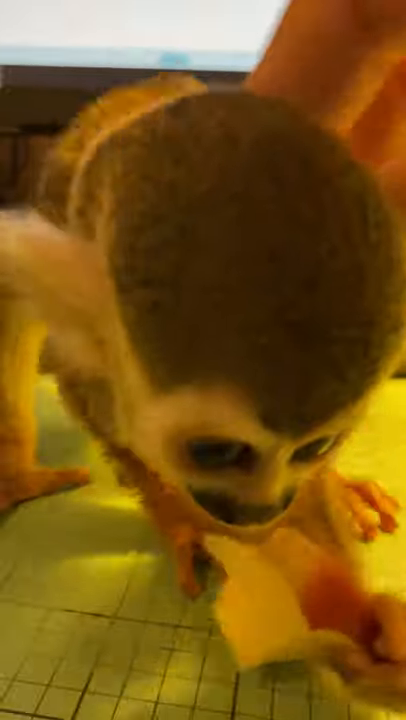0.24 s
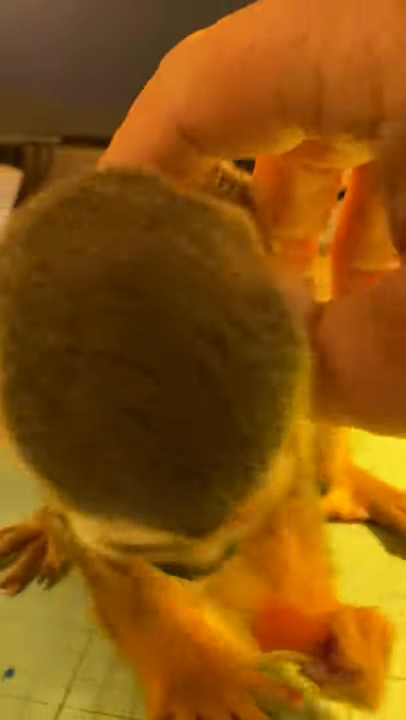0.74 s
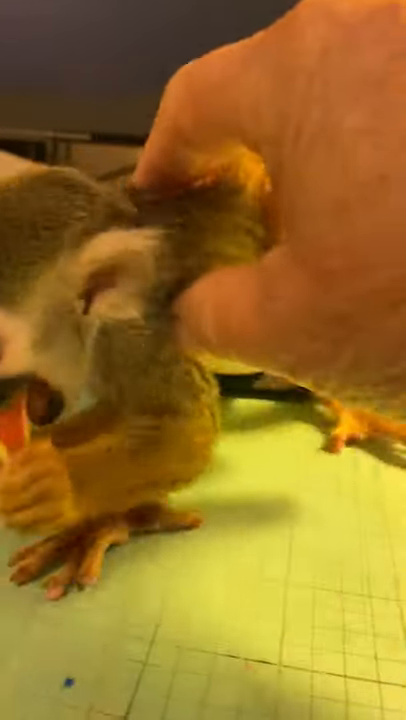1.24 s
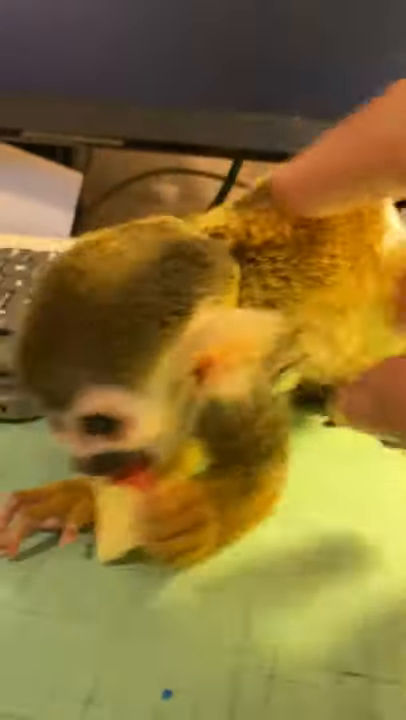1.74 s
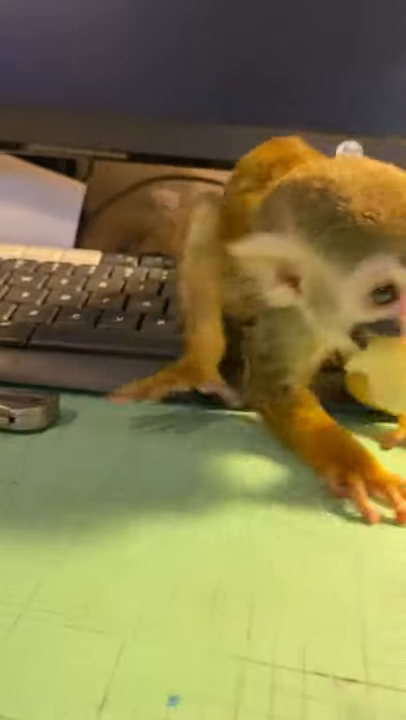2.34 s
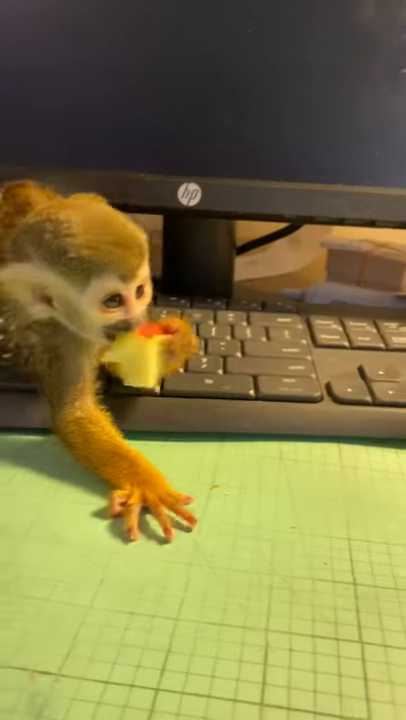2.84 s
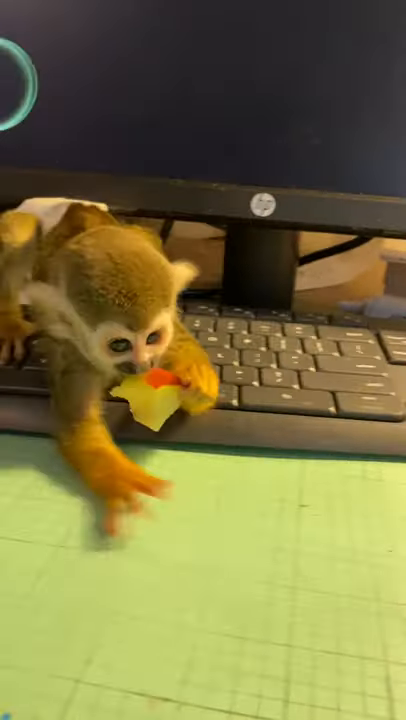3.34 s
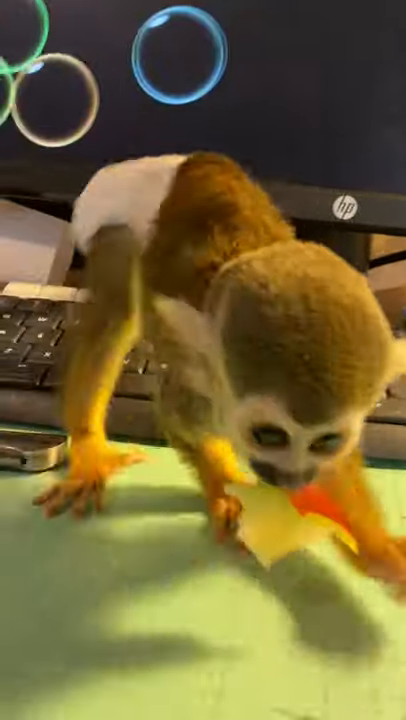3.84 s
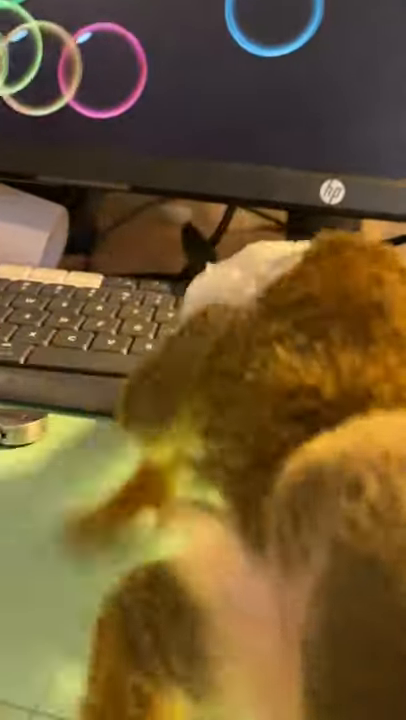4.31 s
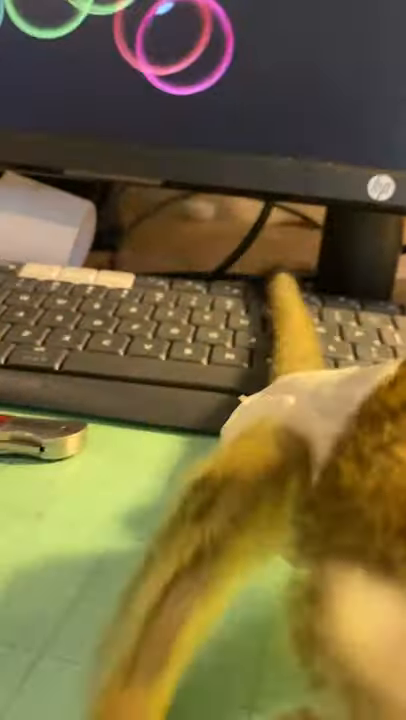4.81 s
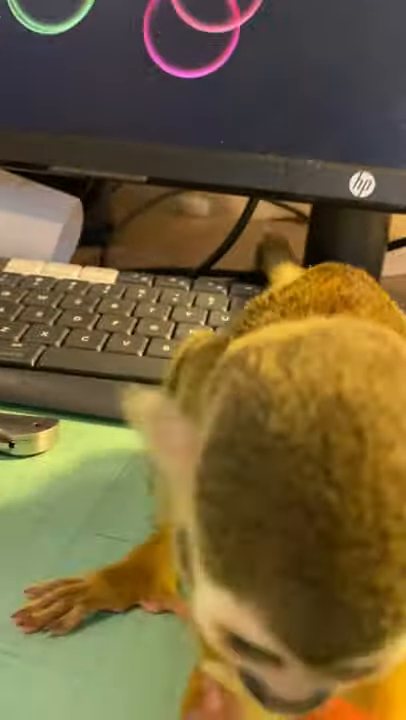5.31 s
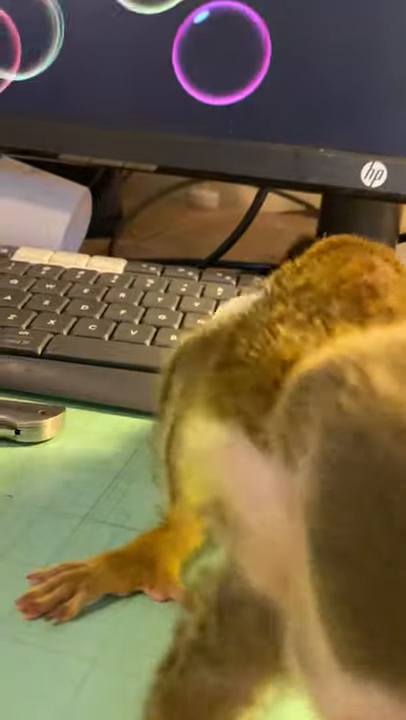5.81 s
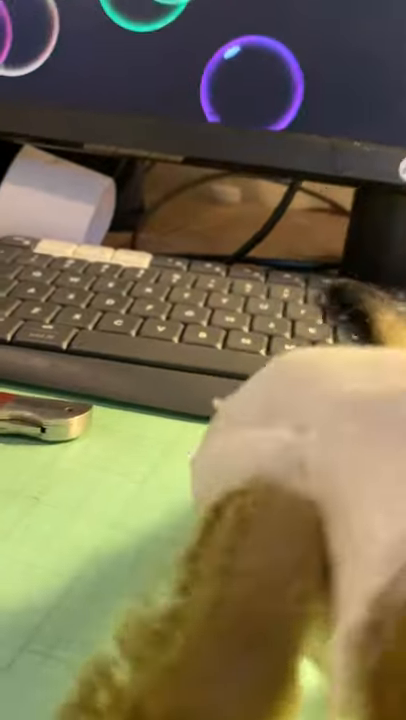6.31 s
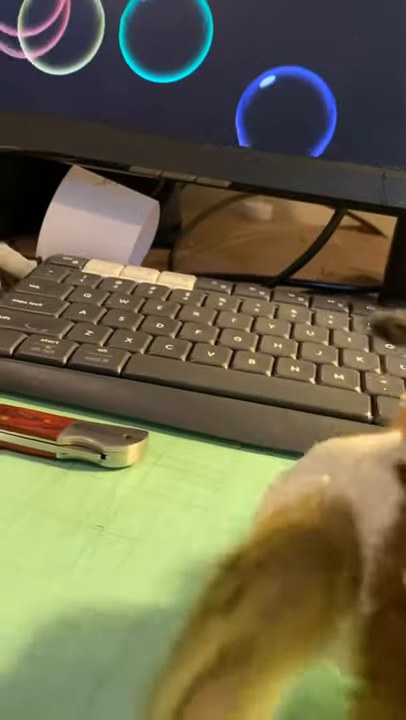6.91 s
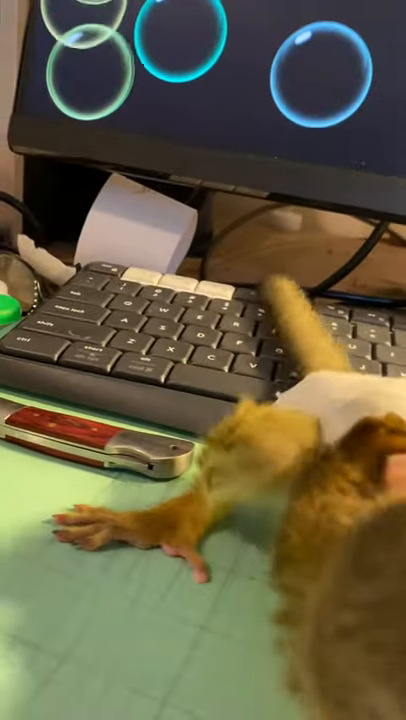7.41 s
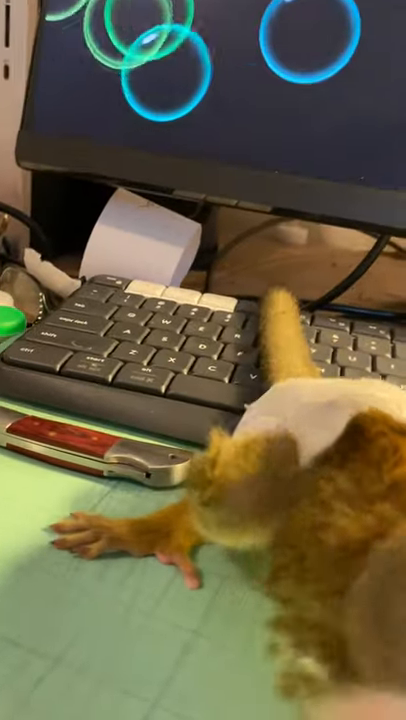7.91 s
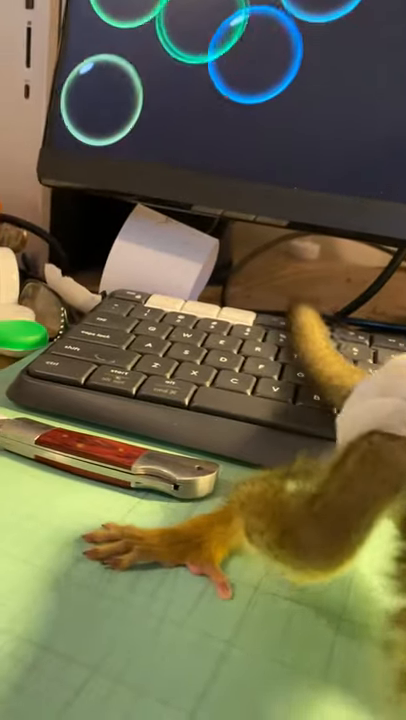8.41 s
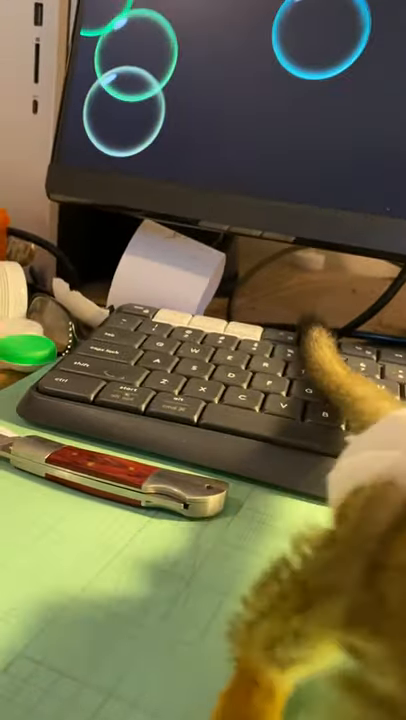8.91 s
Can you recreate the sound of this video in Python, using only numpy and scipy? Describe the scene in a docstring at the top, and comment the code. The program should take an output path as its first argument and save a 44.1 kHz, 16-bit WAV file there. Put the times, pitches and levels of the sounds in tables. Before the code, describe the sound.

A small monkey gives short, very high, whistling peeps that slide up and down in pitch. The loudest cluster comes early, followed by a soft thump. Between further peeps its paws tap and rub lightly on a desk and keyboard, with faint rustles. Later comes one longer fluttering trill, then two last peeps. It is all close to the microphone in a small room, over a faint low computer hum.

```python
"""A baby squirrel monkey carries fruit about a desk in a small room, close up, over a computer's hum.
It opens with a thin, gliding, nearly pure peep. The loudest peeps come at 1.1 s: gain control ducks
everything, and a soft handling thump follows. Between further peeps, paws tap and rub on mat and
keyboard, footfalls ring the desk, its nappy rustles. Near 7 s the pitch flutters in one long trill;
more taps and crease snaps follow, then two last peeps near 8.5 s."""
import sys
import numpy as np
from scipy import signal
from scipy.fft import rfft, irfft, next_fast_len
from scipy.io import wavfile
from scipy.ndimage import uniform_filter1d, map_coordinates

SR = 44100
rng = np.random.default_rng(int(sys.argv[2]) if len(sys.argv) > 2 else 0)


def pcm_store(signal):
    """Save signal as 16-bit PCM."""
    levels = np.round(np.clip(np.atleast_2d(signal), -1, 1) * 32767)
    wavfile.write(sys.argv[1], SR, levels.astype(np.int16).T)


N = 403515
TIME = np.arange(N) / SR

# peeps: (overtone level [dB], glide rows of (time [s], pitch [Hz], level [dB]))
PEEP_GLIDES = [ (-26.5, [(0.0, 6805, -21), (0.01, 6530, -18.5), (0.022, 6260, -22), (0.043, 6130, -28.5)]),
               (-22.5, [(1.011, 7850, -26), (1.023, 7020, -39), (1.033, 6340, -30.5), (1.047, 6596, -29),
               (1.064, 8348, -22.5), (1.078, 7928, -27), (1.094, 7280, -26)]), (-24, [(1.113, 8520, -16),
               (1.124, 9045, 0.5), (1.13, 8494, 7), (1.135, 8153, 0.5), (1.146, 8650, -1.5),
               (1.158, 7630, -16)]), (-26, [(1.19, 10050, -10.5), (1.204, 9830, -9), (1.222, 9270, -6),
               (1.237, 8780, -11), (1.253, 9310, -10.5), (1.275, 8630, -8.5), (1.289, 8070, -13.5)]),
               (-16.5, [(2.353, 7210, -33), (2.368, 6140, -22.5), (2.385, 6696, -8), (2.393, 7410, -6.5)]),
               (-32, [(2.452, 8950, -22), (2.46, 9186, -33), (2.471, 8750, -11), (2.48, 8210, -3.5),
               (2.492, 7580, -12.5), (2.513, 7250, -16.5), (2.532, 8180, -8.5), (2.559, 8000, -9.5),
               (2.576, 7280, -21), (2.616, 7020, -20), (2.622, 6150, -41)]), (-35.5, [(4.024, 5783, -24.5),
               (4.041, 5030, -22.5), (4.047, 6080, -25.5), (4.06, 6640, -20), (4.08, 7790, -29),
               (4.097, 8170, -35.5), (4.135, 6970, -26), (4.168, 6820, -24.5), (4.197, 6452, -16.5),
               (4.228, 5880, -26)]), (-39, [(5.42, 6100, -27.5), (5.433, 5230, -30.5), (5.439, 5680, -43),
               (5.443, 6140, -27.5), (5.47, 7400, -24), (5.491, 8370, -20), (5.525, 7600, -26.5),
               (5.558, 7900, -20.5), (5.587, 6880, -16.5), (5.619, 6853, -22), (5.632, 6960, -32)]),
               (-42, [(6.763, 6530, -41), (6.774, 6266, -27.5), (6.797, 7267, -29), (6.813, 8550, -21),
               (6.828, 8600, -22), (6.856, 8530, -41)]), (-21.5, [(6.862, 9056, -21.5),
               (6.945, 8980, -22.5), (6.963, 8965, -17.5), (6.995, 8580, -18.5), (7.015, 8425, -11),
               (7.054, 8274, -7.5), (7.095, 8160, -14.5), (7.17, 7820, -17.5), (7.185, 6500, -8),
               (7.198, 5550, -20.5)]), (-21.5, [(8.478, 5640, -28.5), (8.486, 5060, -29),
               (8.499, 5370, -23), (8.505, 5520, -3.5), (8.515, 5684, -4.5), (8.525, 7280, -16.5),
               (8.532, 7100, -14)]), (-31, [(8.583, 8620, -20), (8.589, 8750, -12), (8.602, 8310, -16),
               (8.631, 7510, -28), (8.641, 8400, -16.5), (8.657, 8480, -7), (8.671, 7920, -11),
               (8.679, 7820, -5.5), (8.69, 8080, -19)]), ]
# register breaks: (time [s], level [dB], length [s], centre [Hz])
VOICE_CRACKS = [(1.095, -41.5, 0.042, 5010), (1.116, -27, .006, 6513), (1.188, -25.5, 0.0041, 10820),
                (2.35, -48, 0.00407, 9100), (2.45, -46, 0.011, 9600), (4.019, -62, .003, 6013),
                (6.859, -40, 0.012, 8260), (8.504, -38, .025, 8960), (8.577, -28.5, 0.028, 10000)]
# head turn: (time [s], left minus right [dB])
HEAD_TURN = [(8.3, 0.5), (8.48, 2), (8.508, 4), (8.52, 0.5)]
# claws and fruit on keys and mat: (time [s], peak [dB], centre [Hz], bandwidth [octaves])
TAP_HITS = [(0.289, -58, 743, 5.9), (0.343, -55, 1290, 0.26), (0.478, -56.5, 1290, 0.96),
            (0.515, -51, 1520, 1.3), (0.561, -53, 1200, 2), (1.027, -54.5, 2597, 0.38),
            (1.11, -35, 2899, 2.7), (1.113, -45, 984, 0.777), (1.465, -54, 738, 2.3),
            (1.745, -47, 2590, 2.6), (2.008, -54.5, 833, 3), (2.163, -52.5, 2120, 1.8),
            (2.513, -47, 1530, 1.1), (2.653, -51.5, 2260, 0.82), (2.69, -39.5, 2260, 0.97),
            (2.782, -41, 2200, 0.97), (2.831, -43, 2565, 1.7), (2.938, -53.5, 1648, 0.89),
            (2.99, -54, 2000, 0.53), (3.138, -51.5, 1780, 0.89), (3.213, -45, 1355, 0.8),
            (3.26, -43.5, 1980, 1.85), (3.347, -42, 825, 1.9), (3.755, -54.5, 2176, 0.67),
            (3.821, -52, 1805, 1.5), (4.014, -55, 818, 2.1), (4.315, -59, 713, 1.16),
            (4.411, -54, 1490, 3.6), (4.556, -47.5, 770, 4.8), (6.967, -41.5, 2720, 2.4),
            (7.087, -42.5, 1075, 1.26), (7.258, -43.5, 1980, 0.94), (7.336, -46.5, 1320, 1.9),
            (7.951, -46.5, 957, 1.7), (7.968, -43.5, 950, 1.15), (8.578, -42.5, 1902, 3.1)]
# footfalls: (time [s], relative peak [dB])
FOOTFALLS = [(0.515, -55), (1.314, -58), (1.756, -49), (3.346, -45), (3.354, -42), (4.561, -44.5),
             (4.574, -44), (7.952, -47), (7.967, -42.5)]
# desk top modes: (frequency [Hz], relative level [dB], t60 [s])
DESK_MODES = [(136, 5, 0.039), (200, 1, 0.094), (314, 9.5, 0.037), (438, -6.5, 0.054), (610, 1.5, 0.02),
              (845, -17, 0.037)]
# nappy creases: (time [s], peak [dB])
CREASE_SNAPS = [(1.7794, -60), (1.8065, -58), (1.894, -59.5), (1.9451, -54.5), (2.6914, -53), (2.7814, -52),
                (2.8314, -51.5), (3.3149, -53), (3.7696, -56.5), (7.335, -45.5), (8.0364, -50),
                (8.0544, -63), (8.071, -46), (8.25, -65)]
# paw rubs, fur or nappy brushes, weight shifts: (start [s], length [s], level [dB])
RUB_STROKES = [(0.0, 0.078, -81.5), (0.994, .17, -64.5), (1.397, 0.22, -78.5), (2.35, .22, -64.5),
               (2.68, 0.25, -78.5), (3.239, 0.17, -75.5), (3.68, 0.28, -75), (4.015, 0.52, -83),
               (5.428, 0.18, -78), (6.779, .5, -71), (8.141, 0.58, -80.5), (8.85, .25, -93)]
BRUSH_STROKES = [(.47, 0.089, -71), (.83, .1, -70), (1.735, 0.025, -67.5), (1.87, .14, -82.5),
                 (2.98, .08, -69), (3.19, 0.1, -63), (3.5, .11, -60), (3.745, 0.039, -66),
                 (4.31, 0.13, -76.5), (4.55, 0.044, -74.5), (4.82, 0.081, -84.5), (6.32, 0.11, -78.5),
                 (6.65, 0.11, -74.5), (7.32, 0.029, -60.5), (7.99, 0.16, -78), (8.15, 0.1, -68.5)]
SHUFFLE_STROKES = [(0.0, .34, -70), (.9, 0.24, -71), (1.45, .33, -76.5), (1.98, 0.9, -79),
                   (3.17, 1.42, -77.5), (5.35, 0.26, -85), (6.35, 0.86, -74), (8.12, 0.53, -74),
                   (8.85, 0.33, -78.5)]
# their spectra: (frequency [Hz], relative density [dB])
RUB_SPECTRUM = [(290, -33), (500, -5.5), (798, -5), (1020, -4.5), (2030, -7), (2960, -7.5), (5240, -4),
                (6000, -4), (7800, -41), (13200, -120)]
BRUSH_SPECTRUM = [(1000, 4), (2200, 3.5), (4000, 1), (6000, 4), (9000, 2.5), (12500, -4), (14500, -4.5),
                  (16000, -25)]
SHUFFLE_SPECTRUM = [(200, -14.5), (380, 1), (700, -7), (1000, -15), (1600, -26.5)]
# fan rumble, faint hiss: (frequency [Hz], relative density [dB])
FAN_SPECTRUM = [(12, -56), (20, -27.5), (53, -5), (91, -7), (107, -6), (124, 1.5), (157, -13.5),
                (209, -11.5), (280, -18.5), (526, -38), (642, -42.5), (955, -42.5), (1080, -49),
                (1500, -47), (1950, -76), (3300, -120)]
HISS_SPECTRUM = [(400, -6), (1000, -12.5), (2500, 2), (5000, -2), (9000, -10.5), (15500, -18.5)]
# fan envelope: (time [s], level [dB])
FAN_ENVELOPE = [(0, -54), (1.0, -59.5), (1.5, -59.5), (4.5, -61), (5.2, -63), (7.0, -60.5), (8.0, -59.5),
                (9.15, -61)]
# computer hum: (frequency [Hz], level [dB])
HUM_LINES = [(64.8, -71.5), (120.1, -67.5)]
# diffuse sound at the two microphone ports: (frequency [Hz], coherence [0-1])
PORT_COHERENCE = [(100, 1), (250, 0.96), (500, 0.17), (1300, 0.11), (2000, .75), (2900, 0.47), (4700, 0.39),
                  (6000, .85), (7300, 1), (9000, 0.67), (10500, 0.99), (12000, 0.27), (13600, 0.98),
                  (16000, 0.66)]
# phase between the ports: (frequency [Hz], left lead [rad])
PORT_LEAD = [(20, 0), (350, -.1), (700, -1.6), (1300, -1.6), (1800, .2), (2600, .9), (3800, .9), (5200, .5),
             (6300, 2.0), (7300, 3.14), (8500, 4.25), (10000, 6.0), (11000, 6.4), (13600, 9.4),
             (16000, 12.3)]


def peeps(edge_s=.0034, raspy_hz=6300, clear_hz=7814, rasp_db=-22, rasp_s=.014, hiss_db=-33, hiss_s=.04,
          knee_hz=5980, loss_db_per_octave=42, trill_hz=79, trill_swing_hz=96.2, shimmer_db=1.38):
    """A tiny larynx whistles a near sine with a weak, broken octave; low openings rasp and hiss."""
    out = np.zeros(N)
    for overtone_db, glide in PEEP_GLIDES:
        s, pitch_hz, db = np.transpose(glide)
        t = TIME[(TIME > s[0] - edge_s) & (TIME < s[-1] + edge_s)]
        age_s = t - s[0]
        hz = uniform_filter1d(np.interp(t, s, pitch_hz), size=160, mode="nearest")
        level_db = uniform_filter1d(np.interp(t, s, db), size=80, mode="nearest")
        raspiness = np.clip((clear_hz - hz) / (clear_hz - raspy_hz), 0, 1)
        jitter = .0045 * (raspy_hz / hz) ** 2 * drift(500, t)
        rasp = 1 + from_db(rasp_db) * raspiness * np.exp(-age_s / rasp_s) * drift(2200, t)
        trill = gate(t, start_s=6.85, end_s=7.17, edge_s=.04) * np.sin(2 * np.pi * trill_hz * t)
        phase = 2 * np.pi * np.cumsum(hz * (1 + jitter) + trill_swing_hz * trill) / SR
        # the octave partly follows the level and fades above the knee
        loss_db = loss_db_per_octave * np.maximum(np.log2(hz / knee_hz), 0)
        octave_db = overtone_db + .46 * (level_db - db.max()) - loss_db + 3.5 * drift(300, t)
        octave = from_db(octave_db) * (1 + from_db(-9) * drift(1500, t)) * np.sin(2 * phase)
        breath = rms_one(band(rng.standard_normal(len(t)), low_hz=5300, high_hz=13000))
        hiss = from_db(hiss_db) * raspiness * np.exp(-age_s / hiss_s) * breath
        tone = from_db(level_db) * (rasp * np.sin(phase) + hiss) + octave
        shimmer = from_db(shimmer_db * drift(220, t))
        add(out, t[0], np.sqrt(2) * tone * shimmer * gate(t, s[0], s[-1], edge_s))
    return out


def cracks(band_ratio=1.3):
    """The vocal folds rattle briefly, unpitched, at a register jump."""
    out, t = np.zeros(N), TIME[:SR // 10]
    for s, db, length_s, hz in VOICE_CRACKS:
        rattle = rms_one(band(rng.standard_normal(len(t)), hz / band_ratio, hz * band_ratio))
        add(out, s, from_db(db) * rattle * np.exp(-2 * t / length_s))
    return out


def taps(rise_s=.0008, contact_s=.0015, rattle_db=-17, rattle_s=.012, padding_hz=5500,
         ticks_per_rub=2, tick_db=-64.5, tick_hz=1600, tick_octaves=1.4):
    """Padded contact, then loose plastic rattles; narrow bands ring longer. Claws tick during rubs."""
    out, t = np.zeros(N), TIME[:SR // 10]
    padding = signal.butter(2, padding_hz, fs=SR, output="sos")
    ticks = [(start_s + when * length_s, tick_db, tick_hz * 2 ** (pitch - .5), tick_octaves)
             for start_s, length_s, _ in RUB_STROKES for when, pitch in rng.random((ticks_per_rub, 2))]
    for s, db, hz, octaves in TAP_HITS + ticks:
        octaves = max(octaves, .5)
        band_ratio = 2 ** (octaves / 2)
        rattle = from_db(rattle_db) * np.exp(-t * octaves / rattle_s)
        force = (1 - np.exp(-t / rise_s)) * (np.exp(-t / contact_s) + rattle)
        ring = band(force * rng.standard_normal(len(t)), hz / band_ratio, hz * band_ratio)
        add(out, s, at_peak(signal.sosfilt(padding, ring), db))
    return out


def steps(push_s=.0045, trim_db=-3.5):
    """Each soft footfall is a short, uneven push that rings the desk's modes."""
    out, t = np.zeros(N), TIME[:SR // 5]
    desk = sum((-1) ** k * from_db(db - 60 * t / t60_s) * np.sin(2 * np.pi * hz * t)
               for k, (hz, db, t60_s) in enumerate(DESK_MODES))
    for s, db in FOOTFALLS:
        push = rng.standard_normal(len(t)) * np.exp(-t / push_s)
        thud = signal.fftconvolve(push, desk)[:len(t)]
        add(out, s, at_peak(thud, db + trim_db))
    return out


def snaps(decay_s=.001):
    """Nappy creases flip over with a tiny bright crack."""
    out, t = np.zeros(N), TIME[:SR // 50]
    for s, db in CREASE_SNAPS:
        burst = rng.standard_normal(len(t)) * np.exp(-t / decay_s)
        add(out, s, at_peak(band(burst, low_hz=4000, high_hz=15000), db))
    return out


def bump(start_s=1.315, gain_db=-35, first_hz=480, last_hz=62, fall_s=.007, rise_s=.008, decay_s=.02):
    """A dull thump as the animal is handled; its pitch drops into the bass."""
    out, t = np.zeros(N), TIME[:SR // 5]
    hz = last_hz + (first_hz - last_hz) * np.exp(-t / fall_s)
    envelope = from_db(gain_db) * (1 - np.exp(-t / rise_s)) * np.exp(-t / decay_s)
    add(out, start_s, envelope * np.sin(2 * np.pi * np.cumsum(hz) / SR))
    return out


def friction(rub_grain_db=1.5, brush_grain_db=3, pressure_db=1.5):
    """Paws, fur and nappy slide in small catches under wavering pressure; weight shifts sound dull."""
    rub = from_db(rub_grain_db * drift(140)) * stick_slip(RUB_SPECTRUM, catch_db=3.5, rate_hz=55)
    rub *= strokes(RUB_STROKES, attack_s=.045, release_s=.07, rest_db=-101)
    brush = from_db(brush_grain_db * drift(400)) * stick_slip(BRUSH_SPECTRUM, catch_db=2.5, rate_hz=250)
    brush *= strokes(BRUSH_STROKES, attack_s=.012, release_s=.028, rest_db=-88)
    shuffle = noise(SHUFFLE_SPECTRUM)
    shuffle *= strokes(SHUFFLE_STROKES, attack_s=.18, release_s=.08, rest_db=-90.5)
    return (rub + brush + shuffle) * from_db(pressure_db * drift(25))


def strokes(rows, attack_s, release_s, rest_db):
    """Sliding gain: each stroke swells, holds and decays to the stir of a resting animal."""
    gain, t = np.full(N, from_db(rest_db)), TIME[:2 * SR]
    for start_s, length_s, db in rows:
        release = np.exp(-np.maximum(t - length_s, 0) / release_s)
        add(gain, start_s, from_db(db) * np.minimum(t / attack_s, 1) * release)
    return gain


def stick_slip(spectrum, catch_db, rate_hz):
    """Sliding noise in six bands, each catching and slipping on its own; rms 1."""
    spectra = rfft(noise(spectrum), next_fast_len(N, True))
    position = np.log2(np.linspace(500, SR / 2, spectra.shape[1]) / 500)
    bands = [irfft(spectra * np.maximum(1 - np.abs(position - k), 0))[:, :N] for k in range(6)]
    return rms_one(sum(x * from_db(catch_db * drift(rate_hz)) for x in bands))


def computer(hiss_db=-89, waver_db=4, wander_rad=.3):
    """Fan rumble and two wavering hum lines over faint hiss."""
    hum = np.zeros(N)
    for hz, db in HUM_LINES:
        amplitude = np.sqrt(2) * from_db(db + waver_db * drift(5))
        hum += amplitude * np.sin(2 * np.pi * hz * TIME + wander_rad * drift(1.1))
    fan = from_db(curve(FAN_ENVELOPE)) * noise(FAN_SPECTRUM)
    return fan + hum + from_db(hiss_db) * noise(HISS_SPECTRUM)


def room(x, t60_s, late_db, early_db, early_s):
    """Direct sound, early reflections from desk and screen, and the room's tail."""
    diffuse = rms_one(irfft(port_spectra(2 ** 15)[0]))
    t = np.arange(diffuse.shape[1]) / SR
    late = from_db(-60 * t / t60_s) * (1 - np.exp(-t / .012))
    late *= from_db(late_db) / np.linalg.norm(late)
    early = np.exp(-t / early_s) * (t > .001)
    early *= from_db(early_db) / np.linalg.norm(early)
    return x + signal.fftconvolve(x[None], diffuse * (early + late), axes=1)[:, :N]


def noise(spectrum):
    """Shaped diffuse stereo noise, rippled by standing waves; rms 1."""
    spectra, hz = port_spectra(next_fast_len(N, True))
    ripple_db = 1.8 * drift(1 / 35, hz) * np.minimum(hz / 500, 1)
    return rms_one(irfft(spectra * from_db(at_hz(spectrum, hz) + ripple_db))[:, :N])


def port_spectra(size):
    """Diffuse noise spectra at the two ports, and their frequencies."""
    mid, side = rfft(rng.standard_normal((2, size)))
    hz = np.arange(len(mid)) * SR / size
    coherence = np.clip(at_hz(PORT_COHERENCE, hz), 0, .999)
    return np.sqrt(1 + coherence) * mid + np.sqrt(1 - coherence) * side * [[1], [-1]], hz


def gain_control(x, threshold_db=-19, slope=.43, release_db_per_s=60):
    """Gain drops at once by a share of the excess level, then creeps back."""
    power = uniform_filter1d(np.mean(x ** 2, axis=0), size=128)
    excess_db = np.maximum(10 * np.log10(np.abs(power) + 1e-12) - threshold_db, 0)
    release_db = release_db_per_s * TIME
    held_db = np.maximum.accumulate(excess_db + release_db) - release_db
    return x * from_db(-slope * uniform_filter1d(uniform_filter1d(held_db, size=160), size=160))


def from_db(db):
    """Decibels to gain."""
    return 10 ** (np.asarray(db) / 20)


def rms_one(x):
    """Scale to rms 1."""
    return x / np.sqrt(np.mean(x ** 2) + 1e-20)


def at_peak(x, db):
    """Scale to a peak level."""
    return from_db(db) * x / np.abs(x).max()


def curve(rows, at=TIME):
    """Interpolate (x, value) rows linearly."""
    return np.interp(at, *np.transpose(rows))


def at_hz(rows, hz):
    """Interpolate a spectrum in log frequency."""
    knots_hz, values = np.transpose(rows)
    return np.interp(np.log(hz + 1), np.log(knots_hz), values)


def gate(t, start_s, end_s, edge_s):
    """Unit window with smooth edges."""
    inside_s = np.minimum(t - start_s, end_s - t)
    return np.sin(np.pi / 2 * np.clip(inside_s / edge_s + .5, 0, 1)) ** 2


def band(x, low_hz, high_hz):
    """Causal band-pass."""
    return signal.sosfilt(signal.butter(2, [low_hz, high_hz], "band", fs=SR, output="sos"), x)


def drift(rate, t=TIME):
    """Smooth random curve, spread about 1, with rate knots per unit of t."""
    knots = rng.standard_normal(len(t) // 4 + 4)
    return map_coordinates(knots, [(t - t[0]) * rate], order=3, mode="wrap")


def add(out, s, sound):
    """Mix a sound in at time s."""
    i = max(0, round(s * SR))
    out[..., i:i + sound.shape[-1]] += sound[..., :N - i]


def scene():
    """Voice and contacts in the room, over friction and hum."""
    voice = room(peeps() + cracks(), t60_s=.32, late_db=-31.5, early_db=-21, early_s=.017)
    voice *= from_db(curve(HEAD_TURN) * [[.5], [-.5]])
    contacts = room(taps() + steps() + snaps(), t60_s=.18, late_db=-8, early_db=-4, early_s=.0022)
    return voice + contacts + bump() + friction() + computer()


def record(dry, cutoff_hz=16000):
    """Gain control, treble lag at the right port, steep low-pass."""
    size = next_fast_len(N + 2048, True)
    spectra = rfft(gain_control(dry), size)
    hz = np.arange(spectra.shape[1]) * SR / size
    spectra[1] *= np.exp(-1j * curve(PORT_LEAD, hz))
    low_pass = signal.ellip(12, .1, 80, cutoff_hz, fs=SR, output="sos")
    return signal.sosfilt(low_pass, irfft(spectra, size)[:, :N])


dry = scene()
out = record(dry)
pcm_store(out)
```